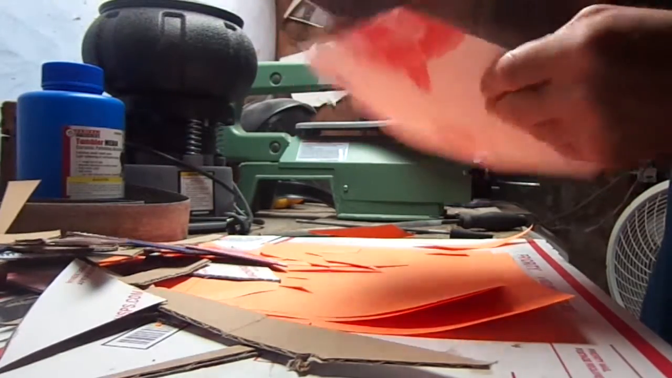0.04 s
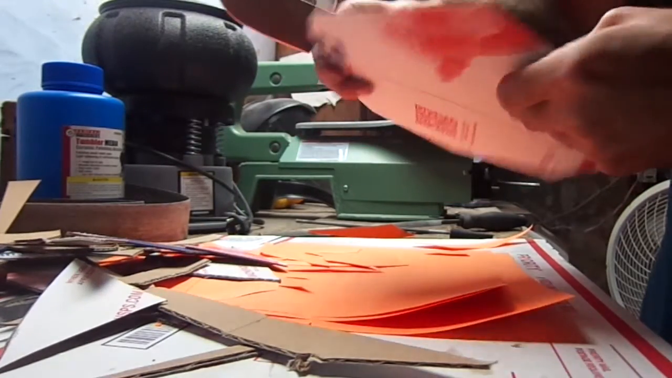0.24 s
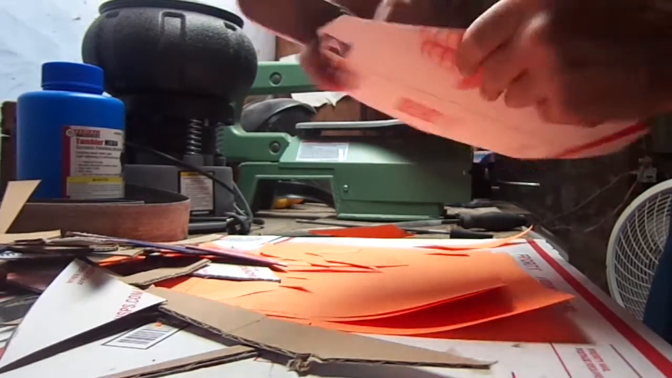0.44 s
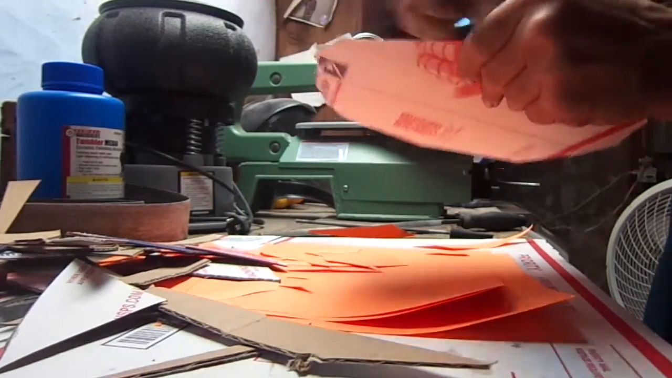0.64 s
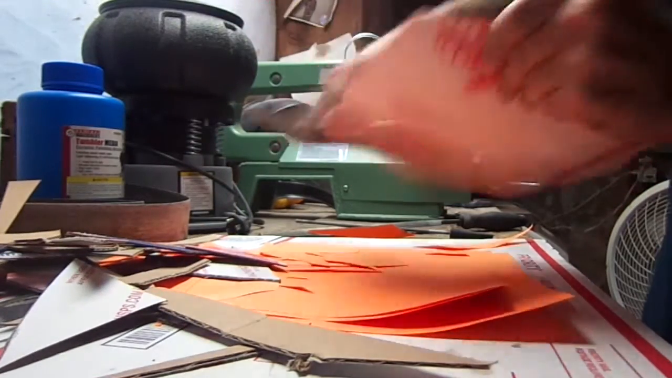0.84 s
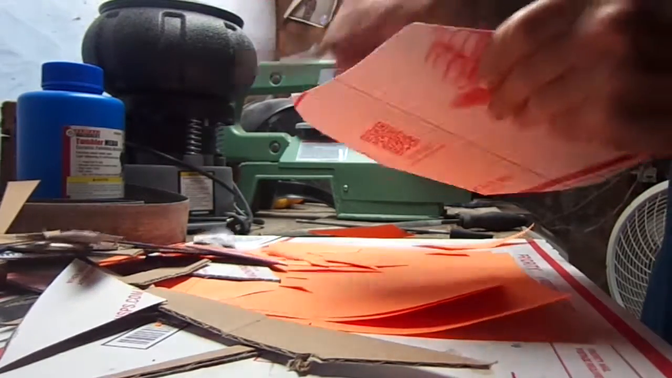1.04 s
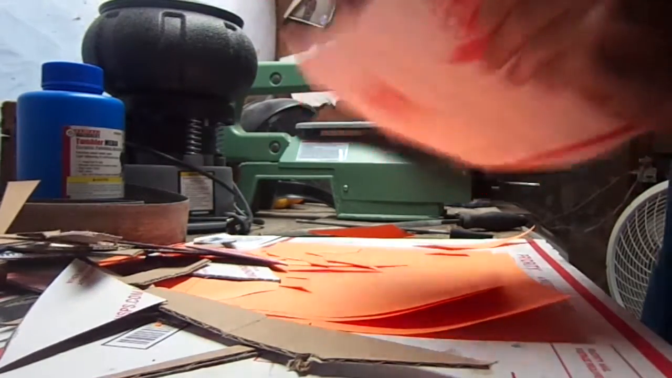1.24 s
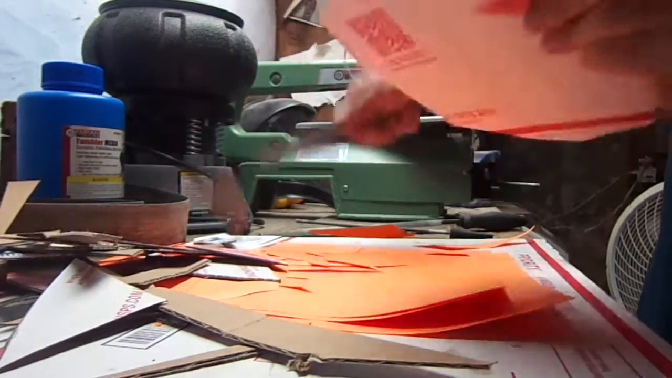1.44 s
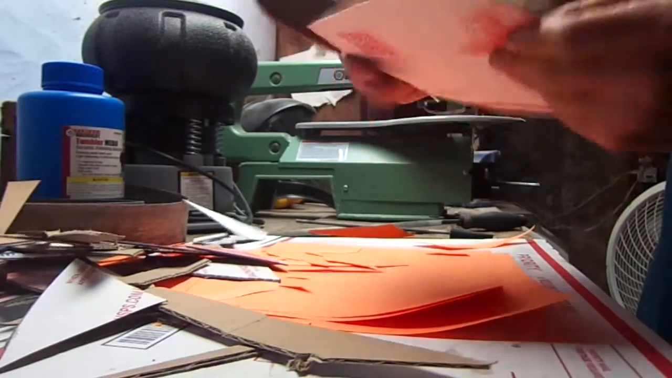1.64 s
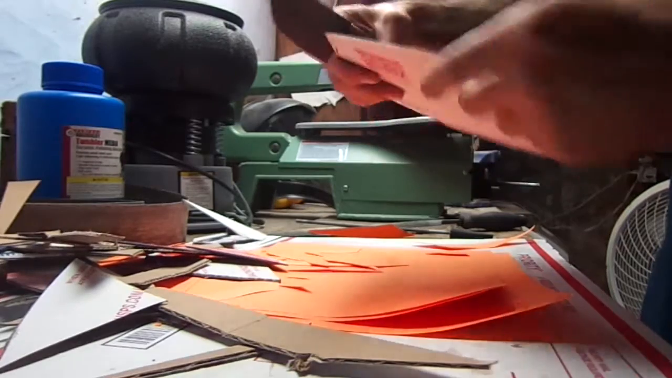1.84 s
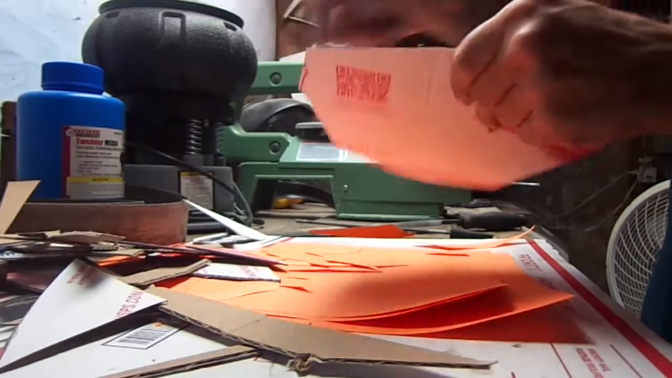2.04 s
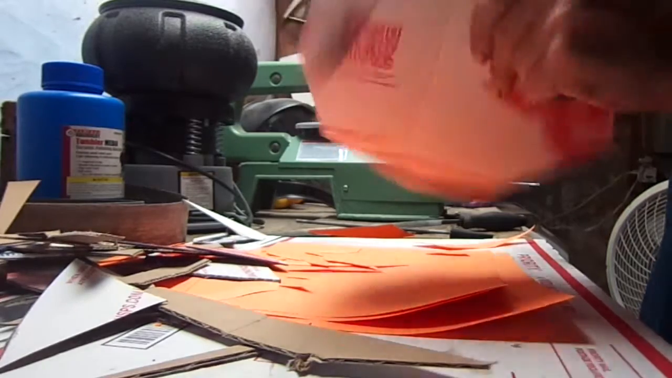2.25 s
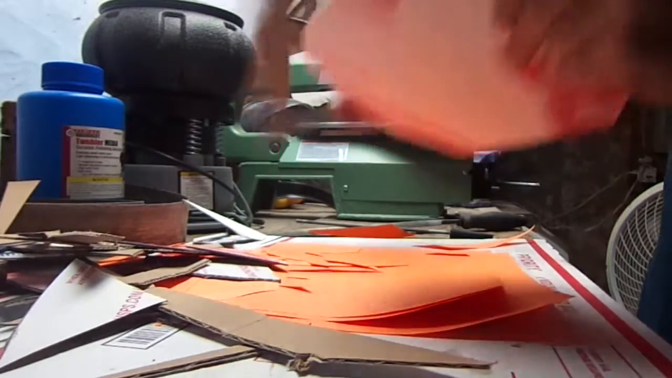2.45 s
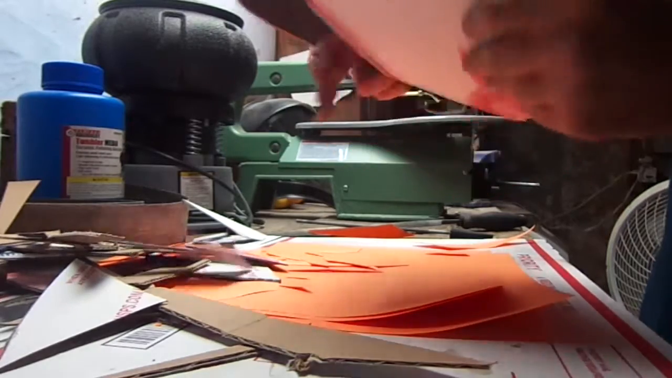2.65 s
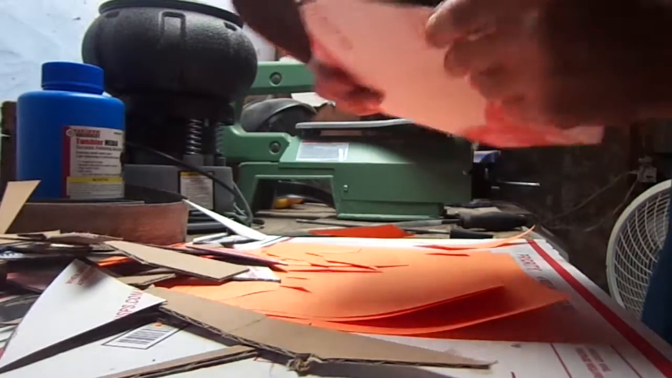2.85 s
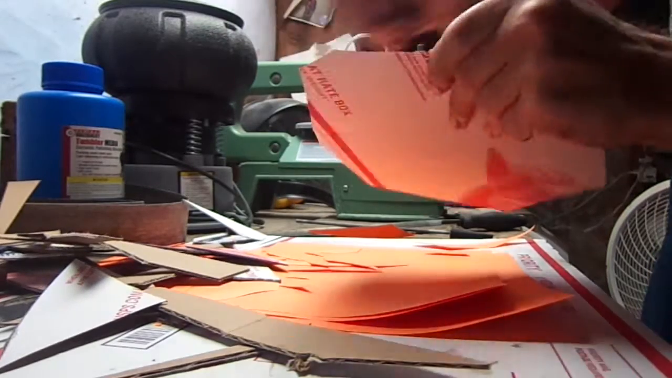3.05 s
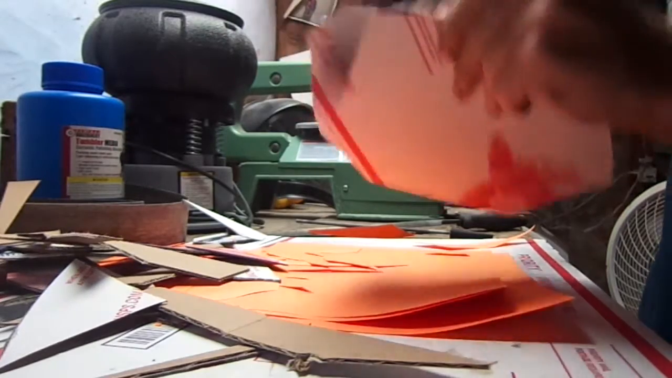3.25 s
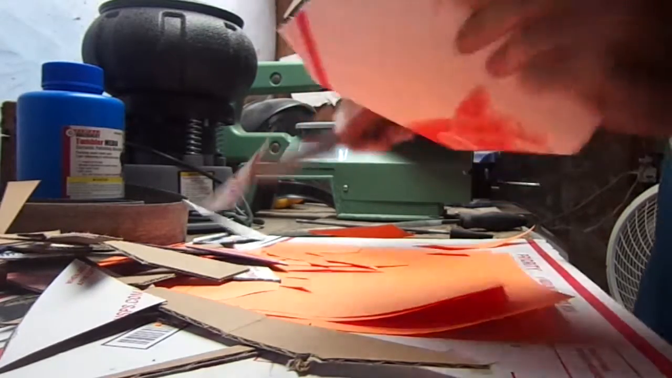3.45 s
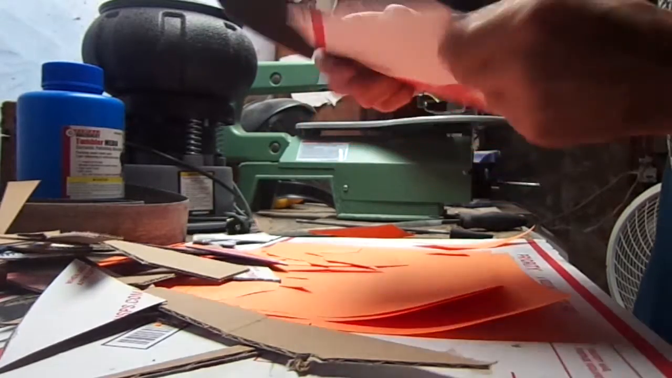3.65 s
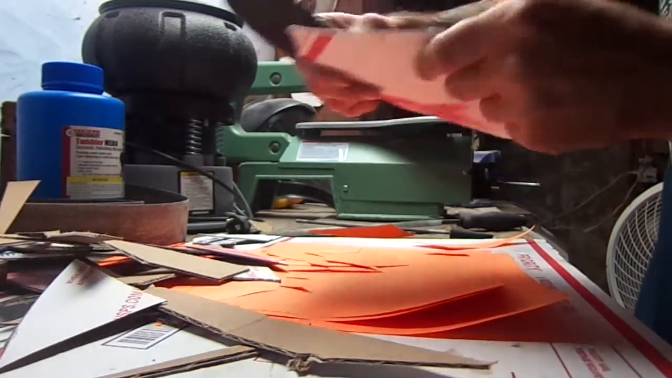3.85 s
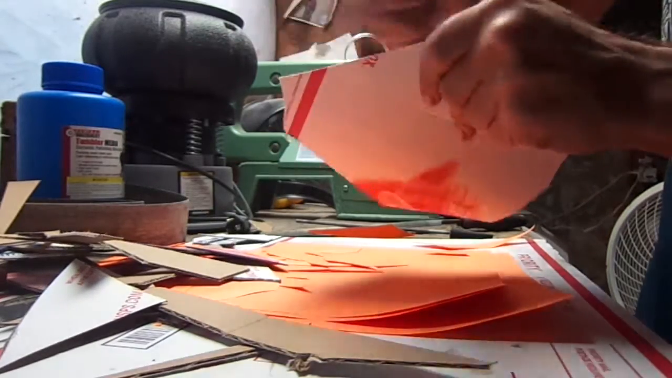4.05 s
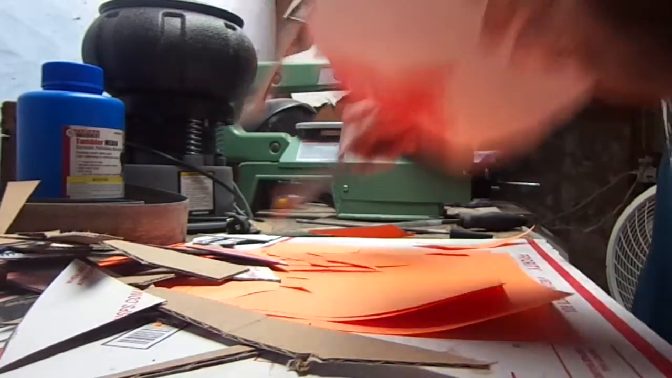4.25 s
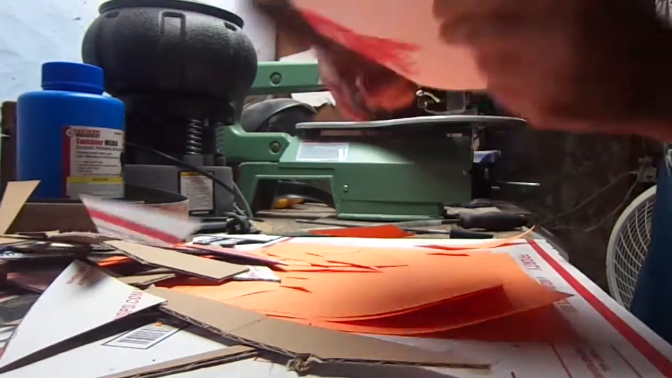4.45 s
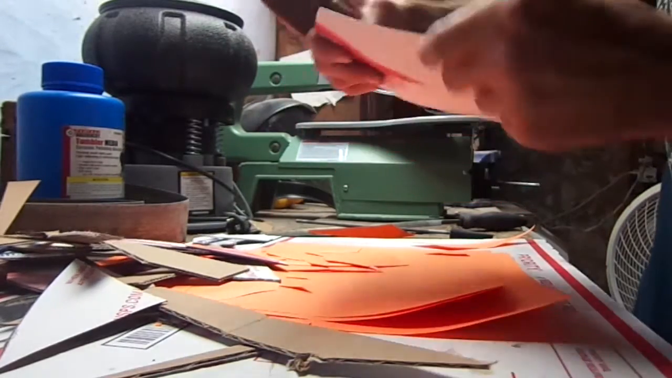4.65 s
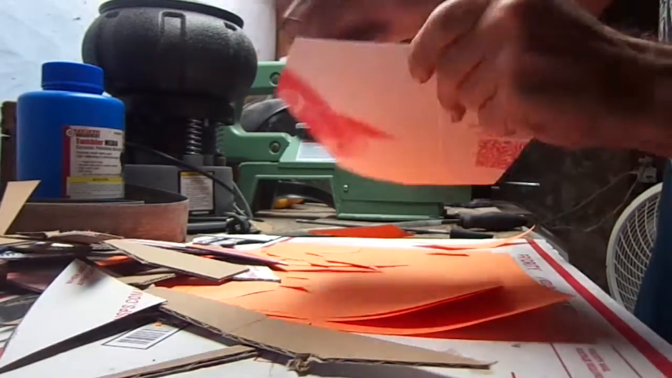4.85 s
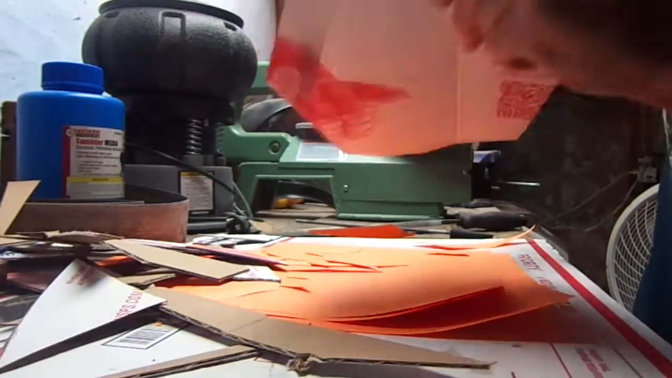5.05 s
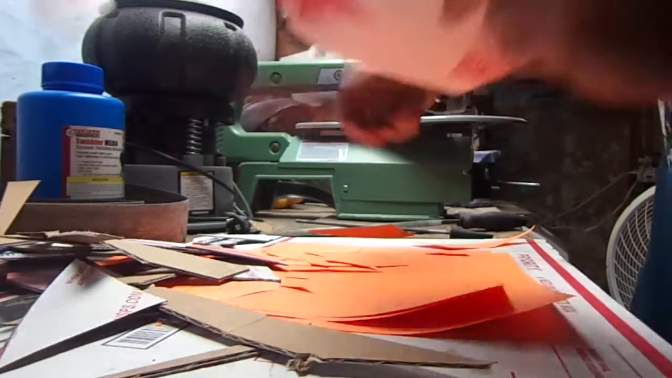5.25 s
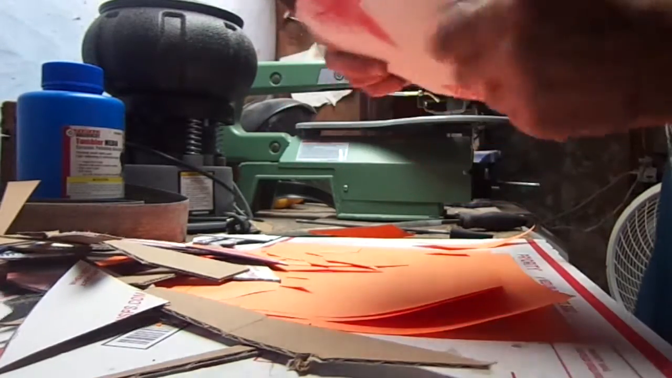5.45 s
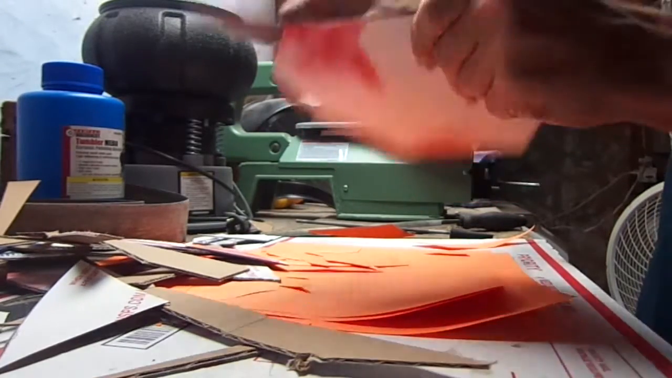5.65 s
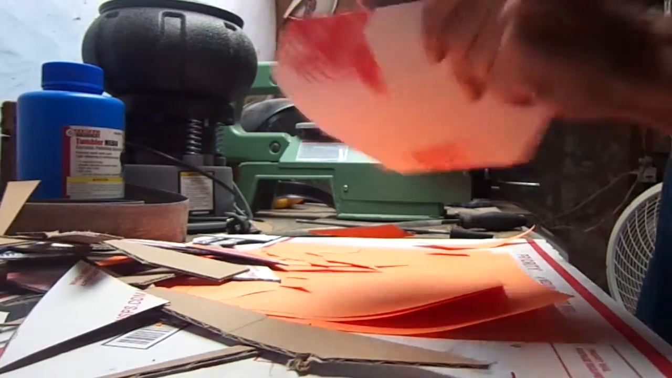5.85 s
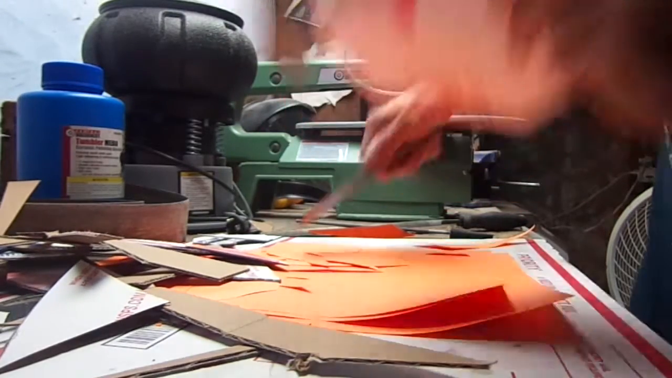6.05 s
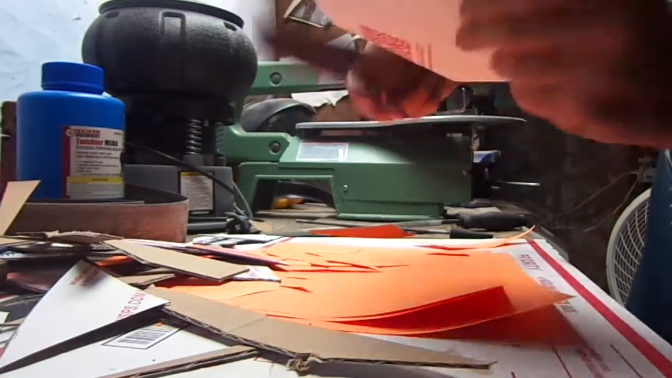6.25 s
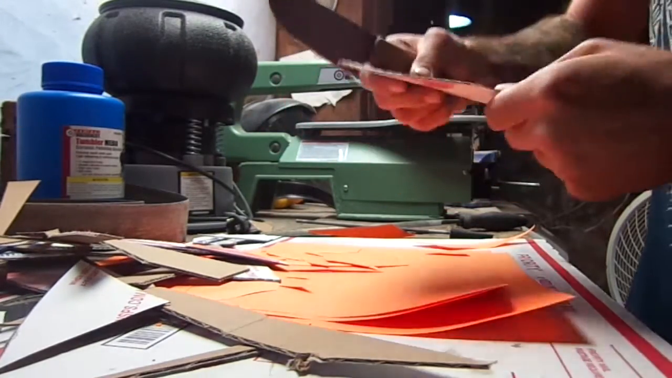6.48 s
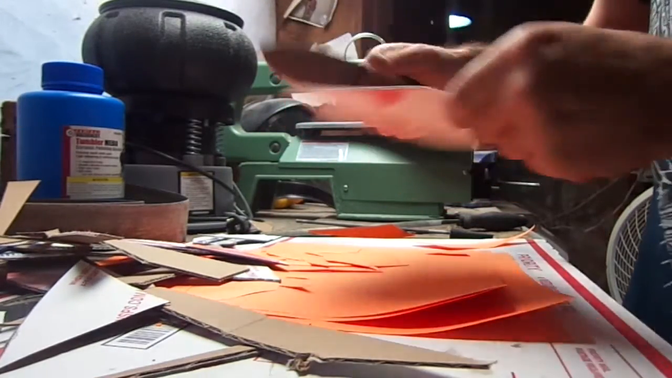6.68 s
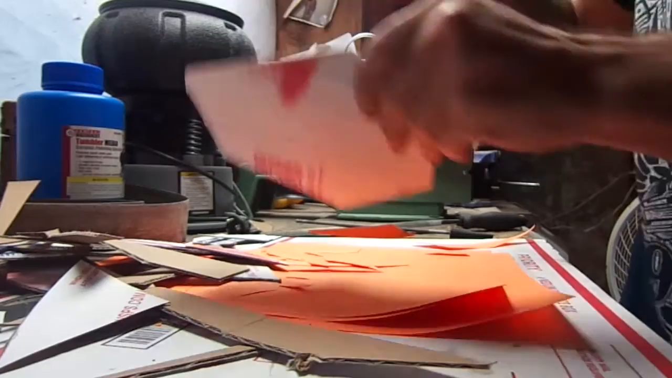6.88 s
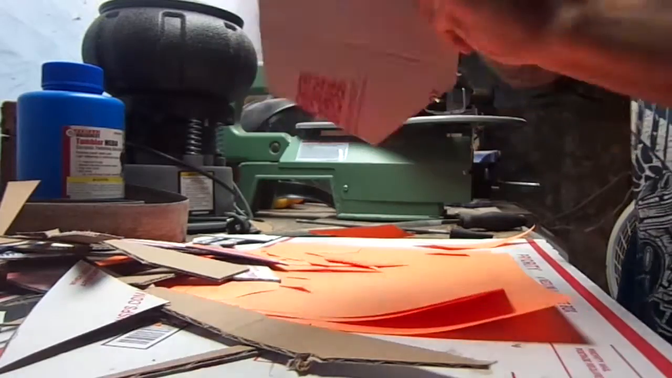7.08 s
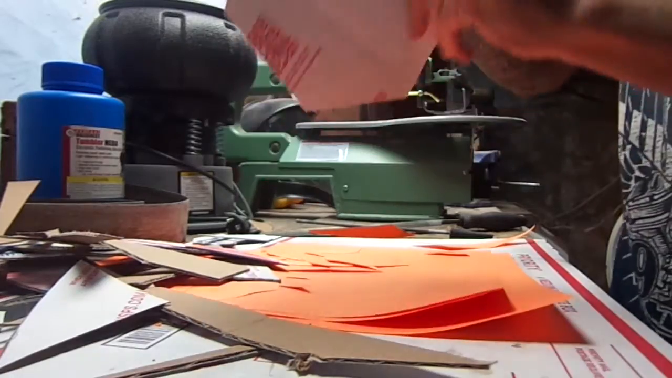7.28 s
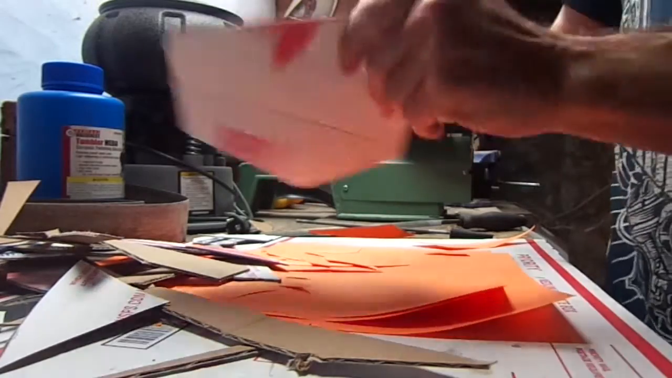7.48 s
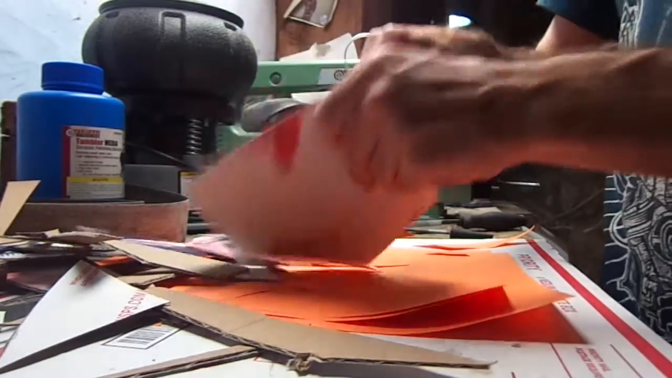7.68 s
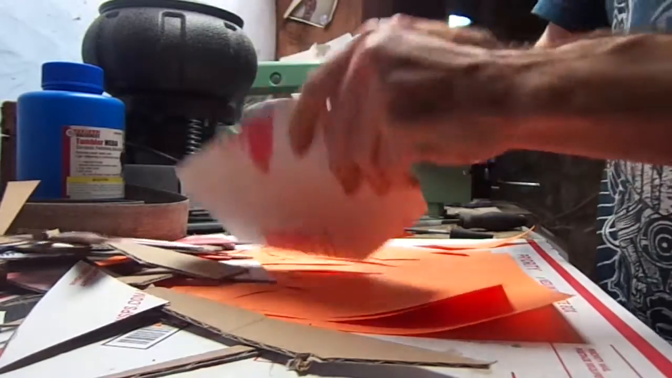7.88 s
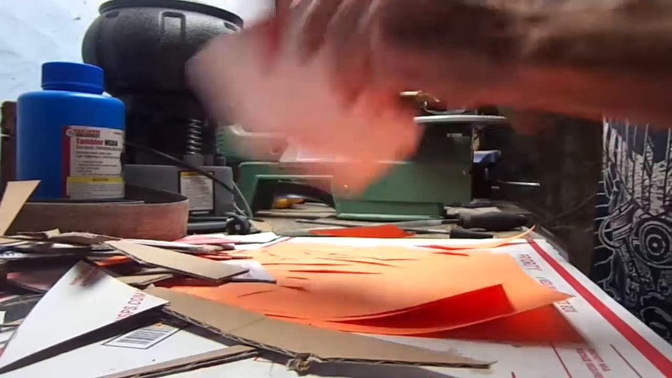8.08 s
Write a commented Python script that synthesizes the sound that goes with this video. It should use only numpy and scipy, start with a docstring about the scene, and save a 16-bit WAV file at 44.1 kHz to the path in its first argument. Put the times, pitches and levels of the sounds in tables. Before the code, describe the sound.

Close up in a small workshop, a blade bites into hand-held card and rasps through it in short, crisp strokes, each ringing a little differently. Soft rustles and the light ticks of falling scraps fill the gaps. After seven cuts, the last stroke hits with a loud crack and drags through in three tugs, followed by several cardboard knocks. A faint, even drone lies underneath.

```python
"""A sharp knife slices strips off a sheet of thin card held above a workbench.
Each cut is a snap as the edge bites, a rasp of parting fibres that sets the sheet ringing, and a flick
as the strip comes free. The last stroke strikes hard and drags through in three pulls. Between cuts,
offcuts drop on the bench and fingers shift the card; a faint steady drone fills the small workshop."""
import sys
import numpy as np
from scipy import signal
from scipy.fft import rfft, irfft, next_fast_len
from scipy.io import wavfile
from scipy.ndimage import uniform_filter1d, map_coordinates

SR = 44100
rng = np.random.default_rng(int(sys.argv[2]) if len(sys.argv) > 2 else 0)


def dump_mix(stems):
    """Bounce the given channels to the path in sys.argv[1] as a 16-bit WAV at rate SR."""
    frames = np.atleast_2d(stems).T  # one column per channel
    limited = np.clip(frames, -1, 1)  # hard clip at full scale
    pcm = np.round(limited * 32767).astype(np.int16)
    wavfile.write(sys.argv[1], SR, pcm)


N = 358091

# Band edges in Hz of a snap's four registers: thud, knock, crack and tick.
REGISTER_EDGES = [250, 650, 1800, 4500, 15000]
# The sheet is gripped and bent anew each time, so it rings differently. One row for each clean cut,
# then one for each pull. Each mode in a row: pitch in Hz, width in Hz, level in dB.
GRIP_MODES = [
    [(479, 92, 0.5), (840, 58, 1.5), (1020, 38, -3), (1365, 130, -0.5)],
    [(423, 56, 2.5), (574, 150, -7.5), (1315, 180, -7), (1800, 72, 2.5)],
    [(399, 43, 7), (786, 120, 6.5), (1040, 87, 0), (1310, 150, 2.5)],
    [(254, 31, 3.5), (515, 32, -10), (790, 120, 3.5), (1040, 59, -5)],
    [(407, 100, 2), (910, 170, -8), (1250, 140, -16), (1700, 66, -1)],
    [(237, 40, -3.5), (460, 120, -1), (1280, 34, 8), (1520, 40, -31)],
    [(540, 430, -4), (810, 120, 3), (1060, 410, 1), (1630, 106, 4)],
    [(393, 19, 1), (1085, 59, 4), (1570, 60, -5)],
    [(480, 50, -5), (1168, 40, 2), (1650, 45, -2)],
    [(416, 35, -3), (1190, 88, -3), (1380, 34, -5)],
]
FADE_S = 0.08  # time left for a stroke to die away


def amp(db):
    """Decibels to gain."""
    return 10 ** (np.asarray(db) / 20)


def unit(x):
    """x at rms 1."""
    return x / np.sqrt(np.mean(x ** 2) + 1e-20)


def along(points, hz):
    """(Hz, value) points read on a log axis."""
    f, v = np.transpose(points)
    return np.interp(np.log(hz + 1), np.log(f), v)


def filtered(x, response):
    """x through a frequency response."""
    n = x.shape[-1]
    m = next_fast_len(n + 8192)
    return irfft(rfft(x, m) * response(np.fft.rfftfreq(m, 1 / SR)), m)[..., :n]


def coloured(x, spectrum):
    """x through an EQ curve of (Hz, dB) points, at rms 1."""
    return unit(filtered(x, lambda hz: amp(along(spectrum, hz))))


def resonances(modes, f):
    """Causal response of (Hz, width in Hz, dB) modes."""
    return sum(amp(db) * 1j * f * width / (hz * hz - f * f + 1j * f * width) for hz, width, db in modes)


def wobble(n, rate):
    """A smooth random curve, rate knots a second."""
    return map_coordinates(rng.standard_normal(int(n * rate / SR) + 4), [np.arange(n) * rate / SR])


def add(track, s, sound):
    """Mix a sound into a track at s seconds."""
    i = max(round(s * SR), 0)
    track[i:i + len(sound)] += sound[:max(N - i, 0)]


def fibre_clicks(n, rate, spread_db):
    """Fibres give way at random moments, rate a second, with uneven sizes."""
    count = rng.poisson(rate / SR, n)
    return unit(np.sqrt(count) * rng.choice([-1, 1], n) * amp(spread_db * rng.standard_normal(n)))


def flexing(x, depth_db):
    """The colour drifts in broad patches as the card flexes and the contact point travels."""
    spectra = signal.stft(x, nperseg=256)[2]
    patches = uniform_filter1d(rng.standard_normal(spectra.shape), size=9, axis=0)
    patches = unit(uniform_filter1d(patches, size=8, axis=1))
    return unit(signal.istft(spectra * amp(depth_db * patches), nperseg=256)[1][:len(x)])


def slides(catch_db=1.0, crackle_db=-5, scrape_db=-2.5):
    """Skin and steel slide over the card in soft swells, catching on its grain with small crackles."""
    # Each row: start in seconds, length in seconds, level in dB, brightness in dB.
    moves = [(0, 0.031, -51.5, -9), (0.209, 0.061, -50.5, 4.5), (0.296, 0.09, -47, 3.5),
             (0.422, 0.055, -51.5, 0.5), (1.624, 0.14, -52, 5.5), (1.83, 0.091, -55.5, 2),
             (1.923, 0.053, -43.5, -4.5), (2.539, 0.067, -49.5, 4), (2.715, 0.067, -50.5, 2),
             (2.806, 0.049, -55, -3), (2.868, 0.052, -48, -3), (3.569, 0.066, -49.5, 2),
             (3.642, 0.16, -54, 1.5), (3.854, 0.047, -49, -2), (3.969, 0.092, -51.5, -12),
             (4.488, 0.063, -42, 2), (4.551, 0.08, -48, 0.5), (4.666, 0.076, -51.5, 4),
             (5.223, 0.12, -59.5, -2), (5.321, 0.094, -44, 0), (5.428, 0.21, -53.5, -2),
             (5.667, 0.057, -61.5, -9.5), (6.16, 0.09, -57.5, 0.5), (6.28, 0.13, -48.5, 1),
             (6.402, 0.22, -58.5, 2.5), (7.427, 0.17, -49.5, -1), (7.622, 0.24, -51, 1),
             (7.707, 0.018, -38, 1), (7.856, 0.027, -51, -10.5)]
    # EQ curves of the low, middle and top layers of friction. Each point: frequency in Hz, gain in dB.
    scrape_eq = [(80, -8), (250, -8), (450, -1.5), (1100, 4.5), (1600, 3.5), (2300, -12), (4000, -29.5)]
    hiss_eq = [(1200, -89), (2200, -1.5), (3200, 1), (5000, -2.5), (6500, -6), (9000, -16)]
    fizz_eq = [(4000, -14.5), (6500, -9), (8500, -5.5), (11000, -1.5), (15000, -15.5)]
    out = np.zeros(N)
    for s, length, level_db, bright_db in moves:
        t = np.arange(int(2 * length * SR)) / SR
        n = len(t)
        swell = np.exp(-np.abs(2 * (t - length) / length) ** 4 / 2)
        grain = fibre_clicks(n, rate=5400, spread_db=1.0) * amp(catch_db * wobble(n, rate=91.5))
        grain = flexing(grain, depth_db=3.5)
        grain += amp(crackle_db) * fibre_clicks(n, rate=160, spread_db=0.5)
        # a bright slide trades scrape for fizz
        scrape = amp(scrape_db - bright_db) * coloured(grain, scrape_eq)
        hiss = coloured(grain, hiss_eq)
        fizz = amp(bright_db) * coloured(grain, fizz_eq)
        add(out, s - length / 2, amp(level_db) * swell * (scrape + hiss + fizz))
    return out


def drone(air_db=-56.5, waver_rad=0.79):
    """Steady room air with a few thin, slightly unsteady tones."""
    # Colour of the room air. Each point: frequency in Hz, gain in dB.
    air_eq = [(15, -25), (25, -5), (64, 1), (118, -5.5), (219, -2.5), (257, 1), (749, -1.5), (927, 2),
              (1500, -4.5), (2180, -3.5), (5280, -12.5), (11200, -13), (12100, -10.5), (15000, -15)]
    # The workshop's tones. Each row: pitch in Hz, rms level in dB.
    whines = [(925, -85), (2225, -75.5), (12280, -85)]
    t = np.arange(N) / SR
    tones = sum(amp(db) * unit(np.sin(2 * np.pi * hz * t + waver_rad * wobble(N, rate=5.7)))
                for hz, db in whines)
    return amp(air_db) * coloured(rng.standard_normal(N), air_eq) + tones


def snap(hz, t60, flutter_db, ring_db=-1, upper_db=-6.5, puff_db=-18, puff_hz=151, puff_t60=0.085):
    """Card buckles or is struck: its main mode, the blade's short upper ring, a puff of air and a dying
    flutter."""
    # Short upper modes that every snap rings. Each row: pitch in Hz, average level in dB.
    upper_modes = [(2340, 2), (2765, 0), (3060, 0), (3190, -7.5), (3590, -1)]
    thud_db, _, crack_db, _ = flutter_db
    t = np.arange(SR // 5) / SR
    out = amp(ring_db) * np.sin(2 * np.pi * hz * t) * amp(-60 * t / (1.16 * t60))
    upper = sum(amp(db + rng.normal(0, 5.2)) * np.sin(2 * np.pi * f * t) for f, db in upper_modes)
    out += amp(crack_db + upper_db) * upper * amp(-60 * t / (1.2 * t60))
    out += amp(thud_db + puff_db) * np.sin(2 * np.pi * puff_hz * t) * amp(-60 * t / puff_t60)
    for band, db in zip(zip(REGISTER_EDGES, REGISTER_EDGES[1:]), flutter_db):
        flutter = rng.standard_normal(len(t)) * amp(-60 * t / t60)
        flutter[0] += 2.05 * np.sqrt(t60 * SR) / 20  # the click of the first push
        flutter = signal.sosfilt(signal.butter(3, band, "band", fs=SR, output="sos"), flutter)
        out += amp(db) * flutter / flutter[:SR // 100].std()  # the first 10 ms set the level
    return out


def brightened(flutter_db, bright_db):
    """A harder contact lifts the crack and tick registers."""
    return np.array(flutter_db) + bright_db * np.array([0, 0, 1, 1])


def taps():
    """Card knocks, buckles and lands; the piece's size and the contact's hardness colour each hit."""
    # Each row: start in seconds, ring pitch in Hz, flutter t60 in seconds, level in dB,
    # flutter level in dB, brightness in dB.
    hits = [(0.0626, 1112, 0.049, -22, -18, 3), (0.1262, 623, 0.078, -23.5, -27.5, -7),
            (0.9505, 1240, 0.097, -31, -28, 1.5), (1.0506, 570, 0.066, -33.5, -41.5, -1.5),
            (1.4596, 1840, 0.034, -43, -48, 8), (1.4727, 1880, 0.038, -27, -31.5, 2),
            (1.489, 2175, 0.13, -35, -32.5, 2.5), (1.6274, 658, 0.13, -32.5, -33.5, 1),
            (1.6717, 1080, 0.06, -39, -43.5, 7), (1.908, 1070, 0.032, -33, -37, 3),
            (1.9205, 1400, 0.039, -36, -30, 2.5), (1.946, 1510, 0.046, -32.5, -38.5, -8),
            (2.4751, 450, 0.14, -46.5, -47, 10.5), (2.5433, 3100, 0.05, -31, -38.5, 5.5),
            (2.6352, 407, 0.17, -32, -35.5, 6), (2.6751, 415, 0.072, -31, -28, -1.5),
            (2.7087, 1590, 0.031, -43, -43, 10), (2.8693, 424, 0.092, -36, -49, 2),
            (3.4507, 853, 0.093, -29, -32.5, 1.5), (3.534, 1170, 0.11, -39, -41.5, 5.5),
            (3.5676, 980, 0.022, -27, -32, -5), (3.612, 1000, 0.13, -33.5, -42, -2),
            (3.6252, 456, 0.094, -24.5, -23.5, 1.5), (4.24, 380, 0.053, -27, -26, -6),
            (4.4085, 957, 0.12, -36, -28, 1), (4.488, 411, 0.09, -28.5, -36, 7.5),
            (4.539, 2450, 0.026, -44, -44, 10.5), (4.7131, 641, 0.094, -36, -35, 0.5),
            (4.7359, 923, 0.062, -33, -39, 9.5), (5.367, 1060, 0.027, -27, -31, -15),
            (5.385, 1540, 0.054, -48, -35, 7), (5.618, 1054, 0.03, -41, -49, 11.5),
            (6.2702, 3590, 0.03, -29.5, -51, 18), (6.3061, 290, 0.066, -26, -21, -2),
            (6.3344, 610, 0.038, -30, -34.5, 7.5), (6.3543, 1120, 0.083, -27.5, -28.5, 1),
            (6.9847, 1560, 0.041, -4, -12, -1), (6.9905, 1456, 0.034, -6, -48, -7),
            (7.0444, 409, 0.012, -24, -19, -4), (7.0479, 415.5, 0.11, -8.5, -14, -4),
            (7.5745, 780, 0.025, -15, -19, -9.5), (7.6004, 247, 0.1, -23, -27, -16),
            (7.6866, 1400, 0.11, -27.5, -34.5, -6), (7.7232, 1166, 0.028, -16, -29, 5.5),
            (7.7695, 825, 0.02, -14.5, -28.5, 7)]
    # Flutter balance in dB: thud, knock, crack, tick.
    balance_db = [-7, -2.5, -10, -10.5]
    # Smaller pieces ring higher, with more knock and crack: each register's lift in dB an octave.
    lift_db_per_octave = [0.5, 2.5, 3, 1.5]
    out = np.zeros(N)
    for s, hz, t60, level_db, flutter_db, bright_db in hits:
        octaves = np.log2(hz / 1000)
        shape_db = brightened(balance_db, bright_db) + octaves * np.array(lift_db_per_octave)
        add(out, s, amp(level_db) * snap(hz, t60, shape_db + flutter_db - level_db))
    return out


def stroke(length, rise_s=0.00067, release_t60=0.033):
    """Time and gain of a stroke that lasts length seconds and then dies away."""
    t = np.arange(int((length + FADE_S) * SR)) / SR
    attack = 1 - np.exp(-t / rise_s)
    return t, attack * amp(-60 * np.maximum(t - length, 0) / release_t60)


def gliding(x, octaves_per_s):
    """x played at a slowly changing speed, for half its length."""
    t = np.linspace(-1, 1, len(x) // 2) * len(x) / SR / 4
    speed = 2 ** (octaves_per_s * (t + FADE_S / 2))
    return map_coordinates(x, [np.cumsum(speed)], mode="mirror")


def parting(n, grip, glide, sharp_db, broad_db=-6, ripple=0.41, ripple_t60=0.0044, grit_db=1.5):
    """The edge parts thousands of fibres a second: the shaken sheet's body and a rasp, each at rms 1."""
    # EQ curves of the sheet's broad body and of the rasp. Each point: frequency in Hz, gain in dB.
    sheet_eq = [(60, -29), (130, -4), (260, -7), (450, 6.5), (700, 5.5), (1100, 9), (1550, 6), (1900, -24),
                (3000, -24)]
    rasp_eq = [(1200, -28.5), (2000, -4), (2700, 2), (3700, 0.5), (5000, -1), (6500, -4.5), (8500, -4.5),
               (11000, -1), (12500, -5), (15000, -14.5)]
    fibres = fibre_clicks(2 * n, rate=16000, spread_db=3.0)
    ringing = gliding(filtered(fibres, lambda f: resonances(grip, f)), glide)
    ringing = coloured(ringing, [(100, -26.0), (220, -3.5), (380, 0.5), (1600, 0), (2000, -19), (3000, 4)])
    body = unit(ringing + amp(broad_db) * coloured(fibres[:n], sheet_eq))
    # the sheet's countless higher modes die at once and ripple the rasp, differently for each cut
    t = np.arange(SR // 100) / SR
    high_modes = rng.standard_normal(len(t)) * amp(-60 * t / ripple_t60)
    rippled = unit(gliding(signal.fftconvolve(fibres, high_modes)[:2 * n], glide))
    # the edge catches and slips on clumps of fibres
    grit = unit(amp(grit_db * wobble(n, rate=430)))
    tearing = flexing((fibres[:n] + ripple * rippled) * grit, depth_db=2)
    rasp = coloured(tearing, rasp_eq)
    return body, coloured(rasp, [(5500, 0), (13000, sharp_db)])


def cuts(sink_s=0.032, sink_db=-22.5, press_db_per_s=21):
    """The edge bites, sinks in, presses ever harder through the sheet and flicks the strip free."""
    # Each row: bite time and flick time in seconds, sheet and rasp levels in dB, glide of the
    # resonances in octaves a second, bite level in dB, bite pitch in Hz, bite brightness in dB,
    # flick level in dB, flick pitch in Hz.
    clean_cuts = [(0.7221, 0.835, -23.5, -19.5, 2.1, -24.5, 1060, 3.5, -25, 1124),
                  (1.2381, 1.331, -20.5, -21, -2, -18, 1300, 3, -23.5, 600),
                  (2.1935, 2.279, -23, -20, 3, -17.5, 423, -9.5, -36, 1040),
                  (3.181, 3.3086, -26, -22.5, 2, -23, 810, 0, -20, 921),
                  (4.1346, 4.2172, -21.5, -21, 7, -19.5, 343, 3.5, -22, 1023),
                  (4.9901, 5.0749, -25.5, -19, 2.3, -23.5, 770, -0.5, -21.5, 1260),
                  (5.8466, 6.0109, -27, -24.5, 1.2, -19, 1070, -1.5, -18, 933)]
    bite_flutter_db, flick_flutter_db = [-6.5, -7.5, -12.5, -9], [-7.5, -3.5, -18, -11]
    out = np.zeros(N)
    for cut, grip in zip(clean_cuts, GRIP_MODES):
        s, free_s, sheet_db, rasp_db, glide, bite_db, bite_hz, bright_db, flick_db, flick_hz = cut
        length = free_s - 0.00803 - s  # the push ends just before the strip is free
        t, gain = stroke(length)
        sinking_db = sink_db * np.maximum(1 - t / sink_s, 0)
        effort = gain * amp(sinking_db + press_db_per_s * (t - length / 2))
        body, rasp = parting(len(t), grip, glide, sharp_db=3)
        bite = snap(bite_hz, t60=0.048, flutter_db=brightened(bite_flutter_db, bright_db))
        flick = snap(flick_hz, t60=0.06, flutter_db=flick_flutter_db)
        add(out, s, amp(bite_db) * bite)
        add(out, s, effort * (amp(sheet_db) * body + amp(rasp_db) * rasp))
        add(out, free_s, amp(flick_db) * flick)
    return out


def drags(ends_db=-12):
    """The jammed blade is pulled on through the card in short, duller swells."""
    # Each row: start and length in seconds, sheet and rasp levels in dB, the rasp's top-end gain in dB.
    pulls = [(6.995, 0.063, -22.5, -30.5, -8), (7.099, 0.073, -25.5, -26.5, -14.5),
             (7.276, 0.042, -32, -36, -9)]
    out = np.zeros(N)
    for (s, length, sheet_db, rasp_db, sharp_db), grip in zip(pulls, GRIP_MODES[-len(pulls):]):
        t, gain = stroke(length)
        effort = gain * amp(ends_db * (2 * t / length - 1) ** 2)
        body, rasp = parting(len(t), grip, glide=0, sharp_db=sharp_db)
        add(out, s, effort * (amp(sheet_db) * body + amp(rasp_db) * rasp))
    return out


def workshop(x, near_db=-0.5, tail_db=-15, build_s=0.0036):
    """Near surfaces reflect at once; the room rings on briefly, longest in the low mids."""
    # Reflections off the bench and its tools. Each row: delay in seconds, gain.
    bounces = [(.0019, 0.12), (.0034, 0.047), (.0052, 0.087), (.0083, 0.037)]
    # The room's decay. Each point: frequency in Hz, t60 in seconds.
    decay_times = [(150, 0.34), (450, 0.45), (1500, 0.34), (5000, 0.3), (14000, 0.18)]
    # The room's low standing wave: pitch in Hz, width in Hz, level in dB.
    standing_wave = [(153.8, 17, 17.5)]
    hz, t, noise = signal.stft(rng.standard_normal(SR // 2), SR, nperseg=256)
    decay = amp(-60 * t / along(decay_times, hz)[:, None])
    tail = signal.istft(noise * decay * (1 - np.exp(-t / build_s)), SR, nperseg=256)[1]
    tail /= np.linalg.norm(tail)
    tail_eq = [(200, 0.16), (420, 1)]
    tail = filtered(tail, lambda f: amp(along(tail_eq, f)) * (1 + resonances(standing_wave, f)))
    near = filtered(x, lambda f: 1 + sum(g * np.exp(-2j * np.pi * f * delay) for delay, g in bounces))
    return amp(near_db) * near + amp(tail_db) * signal.fftconvolve(x, tail)[:N]


def scene():
    """Knife and card in the workshop, over its drone, alike in both channels."""
    sound = workshop(cuts() + drags() + taps() + slides()) + drone()
    return np.array([sound, sound])


def record(dry, low_cut_hz=95, top_hz=15150):
    """The bass is thinned, peaks clip at full scale and the very top is cut off steeply."""
    thinned = signal.sosfilt(signal.butter(1, low_cut_hz, "high", fs=SR, output="sos"), dry)
    return filtered(np.clip(thinned, -1, 1), lambda hz: 1 / (1 + (hz / top_hz) ** 120))


dry = scene()
out = record(dry)
dump_mix(out)
```